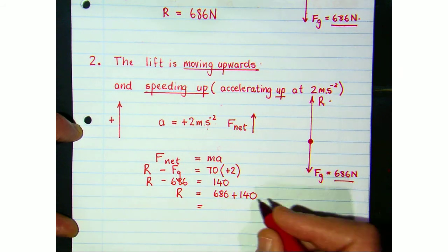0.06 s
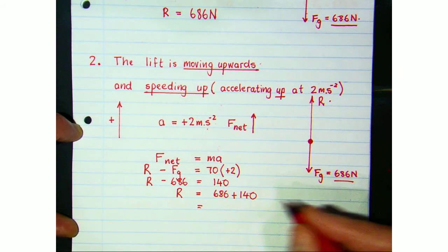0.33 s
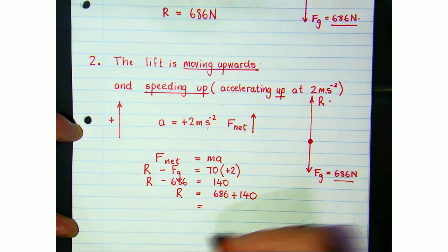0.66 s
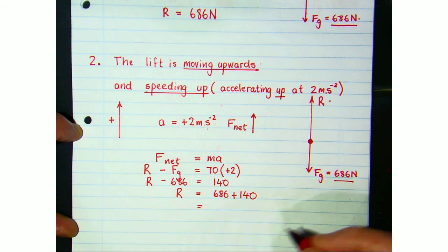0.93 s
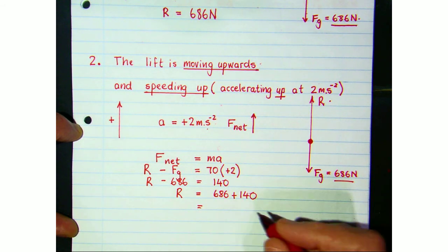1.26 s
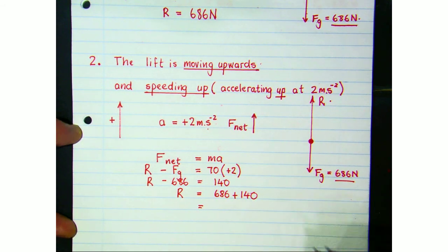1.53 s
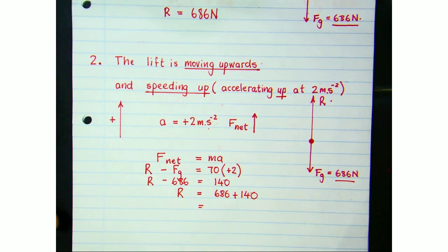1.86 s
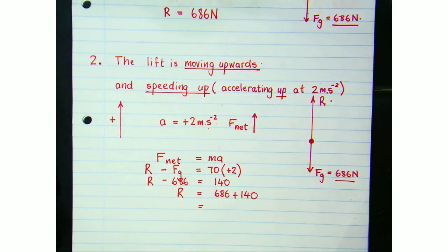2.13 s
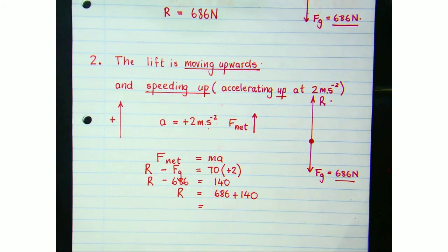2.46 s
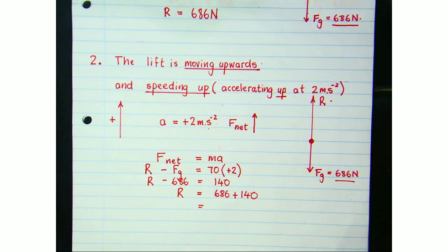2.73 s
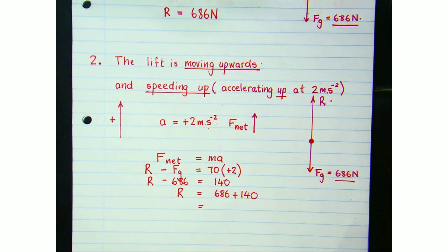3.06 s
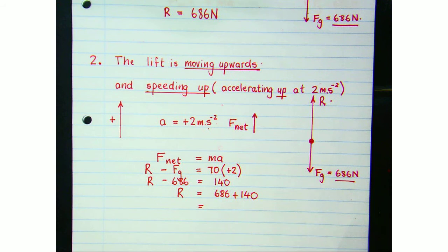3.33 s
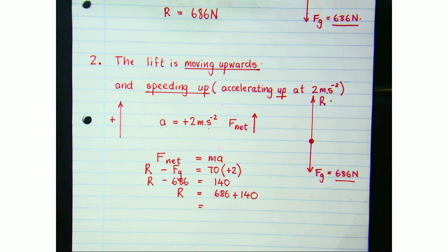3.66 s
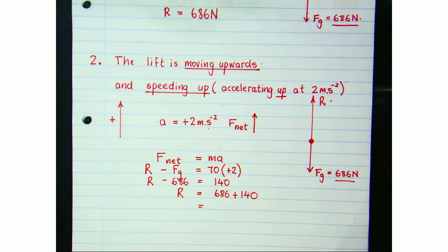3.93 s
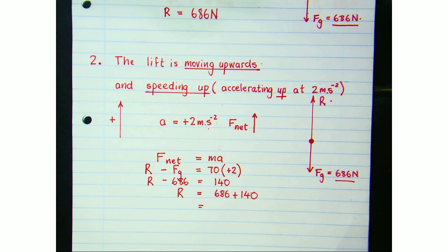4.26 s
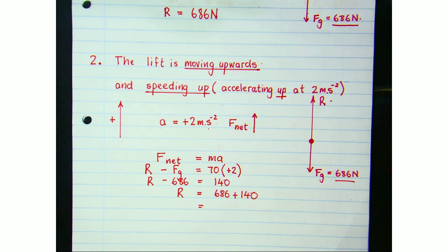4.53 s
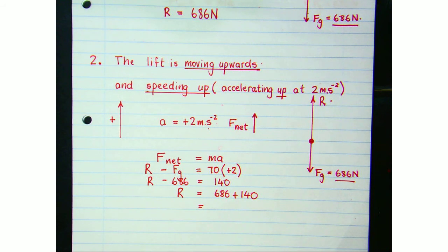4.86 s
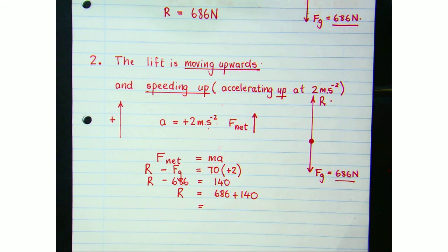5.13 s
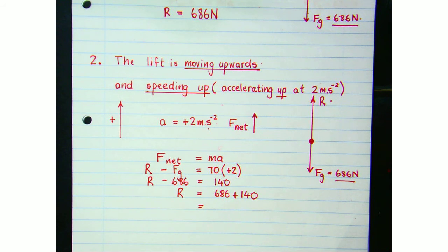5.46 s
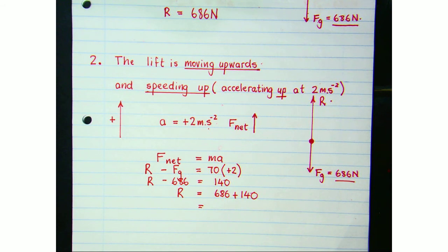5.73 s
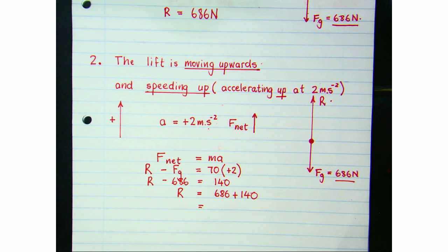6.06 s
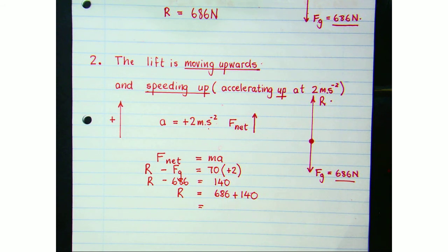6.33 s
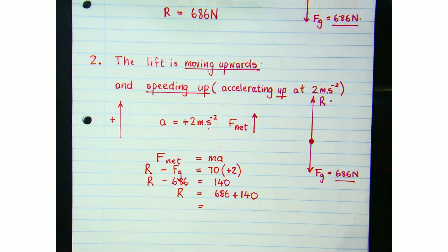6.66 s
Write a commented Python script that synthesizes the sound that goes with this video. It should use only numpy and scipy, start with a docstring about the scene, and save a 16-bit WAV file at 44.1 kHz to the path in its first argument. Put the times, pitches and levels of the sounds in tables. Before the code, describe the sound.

In a small room, a pen clatters onto a desk, then paper is briefly scuffed and softly tapped over faint hiss.

```python
"""A pen put aside on a wooden desk

In a small room a plastic pen judders over a desk by stick-slip friction, drops with a sharp clack
and bounces, setting wood and barrel ringing in their modes. Later paper is scuffed and lightly
tapped, and bumps on the desk set the microphone stand swaying and something loose buzzing.
Under it all lie hiss, a soft room hum, and a thin electronic whine with faint pips."""
import sys
import numpy as np
from scipy import signal
from scipy.fft import rfft, irfft
from scipy.io import wavfile

SR = 44100
rng = np.random.default_rng(int(sys.argv[2]) if len(sys.argv) > 2 else 0)


def digitize_waveform(pressure):
    """Quantize a signal to 16-bit integers and store it at the path in sys.argv[1].

    Rows of a 2-D input are taken as channels; values are limited to [-1, 1].
    """
    field = np.atleast_2d(pressure).T
    bounded = np.clip(field, -1, 1)
    quanta = np.round(bounded * 32767).astype(np.int16)
    wavfile.write(sys.argv[1], SR, quanta)


N = 295602
TIME = np.arange(N) / SR
AGE = TIME[:SR]   # the second that follows a blow


def from_db(db):
    """Amplitude ratio of a level in decibels."""
    return 10 ** (np.asarray(db) / 20)


def unit_energy(x):
    """Normalisation to a sum of squares of one."""
    return x / np.sqrt(np.sum(x ** 2) + 1e-20)


def at_hz(points, hz):
    """Interpolation on a logarithmic frequency axis."""
    knots, values = np.transpose(points)
    return np.interp(np.log(np.maximum(hz, 1)), np.log(knots), values)


def decay(t60, age=AGE):
    """Exponential damping: the level falls 60 dB in t60 seconds."""
    return from_db(-60 * age / t60)


def add(track, start_s, sound):
    """Superposition of a sound on a track."""
    start = min(round(start_s * SR), N)
    track[start:start + len(sound)] += sound[:N - start]


def low_pass(x, hz, order=2):
    """Butterworth low-pass filter."""
    return signal.sosfilt(signal.butter(order, hz, fs=SR, output="sos"), x)


def colour(x, spectrum):
    """Minimum-phase filter: folding the cepstrum makes the given spectrum causal."""
    size = 2 * len(x)
    gain = from_db(at_hz(spectrum, np.fft.rfftfreq(size, 1 / SR)))
    cepstrum = irfft(np.log(gain))
    cepstrum[1:size // 2] *= 2
    cepstrum[size // 2 + 1:] = 0
    return irfft(rfft(x, size) * np.exp(rfft(cepstrum)))[:len(x)]


def contact(t60, scatter_db, grain_db):
    """Contact force: one impulse, then a dying swarm of uneven small ones."""
    age = AGE[:SR // 4]
    swarm = rng.standard_normal(len(age))
    grain = from_db(grain_db * rng.standard_normal(len(age)))
    force = from_db(scatter_db) * unit_energy(swarm * grain * decay(t60, age))
    force[0] += 1
    return force


def ringing(modes, spread_db):
    """Modal sum: damped sines of alternating sign, their levels scattered by spread_db."""
    out = np.zeros(SR)
    for k, (hz, db, t60) in enumerate(modes):
        amplitude = (-1) ** k * from_db(db + spread_db * rng.normal())
        out += amplitude * decay(t60) * np.sin(2 * np.pi * hz * AGE)
    return out


def single_rings(rows, rise_s, waver_rad, waver_hz):
    """Damped resonances, one per row, each with a soft onset and a wavering phase."""
    out = np.zeros(N)
    for start_s, hz, db, t60 in rows:
        wander = np.sqrt(SR) * unit_energy(low_pass(rng.standard_normal(SR), waver_hz))
        envelope = (1 - np.exp(-AGE / rise_s)) * decay(t60)
        add(out, start_s, from_db(db) * envelope * np.sin(2 * np.pi * hz * AGE + waver_rad * wander))
    return out


def wavering_tone(hz, rate_hz, depth):
    """Random modulation: a carrier of unit rms trembles in amplitude and phase."""
    slow_noise = low_pass(rng.standard_normal((2, N + SR)), rate_hz)[:, SR:]
    in_phase, quadrature = depth * np.sqrt(N) * unit_energy(slow_noise)
    phase = 2 * np.pi * hz * TIME
    return np.sqrt(2) * ((1 + in_phase) * np.cos(phase) + quadrature * np.sin(phase))


# room and microphone noise: (frequency [Hz], relative spectral density [dB])
HISS_SPECTRUM = [(16, 2.5), (55, -9), (120, -13), (320, -21.5), (620, -23), (1050, -27.5), (1380, -24),
                 (2200, -27.5), (3000, -27), (3550, -31), (4050, -29.5), (5200, -34.5), (8900, -33),
                 (10700, -36), (15800, -39.5)]
# hum and electronic whine: (frequency [Hz], carrier rms level [dB], modulation depth [ratio])
HUM_TONES = [(571, -63.5, .26), (646, -72, .4), (732, -79, .8), (2530, -72.5, .25), (6438, -78, .5),
             (9658, -77, .3), (9690, -74.5, .25), (12878, -77.5, .3), (12909, -67.3, .09)]


def background(hiss_db, pip_db, pip_hz):
    """Noise floor: broadband hiss, narrow lines of hum and whine, and periodic electronic pips."""
    hiss = from_db(hiss_db) * np.sqrt(N) * unit_energy(colour(rng.standard_normal(N), HISS_SPECTRUM))
    hum = sum(from_db(db) * wavering_tone(hz, rate_hz=41.0, depth=depth) for hz, db, depth in HUM_TONES)
    first_s, period_s, width_s = 0.028, 0.1258, 0.006
    from_pip_s = (TIME - first_s + period_s / 2) % period_s - period_s / 2
    pips = from_db(pip_db) * np.exp(-(from_pip_s / width_s) ** 2) * np.sin(2 * np.pi * pip_hz * TIME)
    return hiss + hum + pips


# reverberation of the room: (frequency [Hz], T60 [s])
ROOM_DECAY = [(100, 0.35), (500, 0.44), (2000, 0.45), (5000, 0.38), (12000, 0.24)]


def room(x, build_s):
    """Reverberation: diffuse reflections build up and die away, the treble first."""
    hz = np.fft.rfftfreq(SR, 1 / SR)
    white = rfft(rng.standard_normal(SR))
    edges_hz = np.geomspace(60, SR / 2, 9)
    tail = np.zeros(SR)
    for low, high in zip(edges_hz, edges_hz[1:]):
        band = irfft(white * (hz >= low) * (hz < high), SR)
        tail += band * decay(at_hz(ROOM_DECAY, np.sqrt(low * high)))
    response = unit_energy(tail * (1 - np.exp(-AGE / build_s)))
    return signal.fftconvolve(x, response)[:N]


# bumps that reach the microphone stand:
# (time [s], sway gain [dB], thud gain [dB], thud cutoff [Hz], loss per rebound [dB])
STAND_BUMPS = [(4.186, -31, -24.5, 188, 5.5), (4.927, -34, -40, 160, 4), (6.111, -33, -45, 80, 0),
               (6.34, -26, -31.5, 220, 5), (6.546, -37, -27, 520, 3.5)]
# modes of desk and stand: (frequency [Hz], relative level [dB], T60 [s])
STAND_MODES = [(65, -18, 0.82), (98, 1, 0.077), (136, -9.5, 0.146), (187.3, -7, 0.072), (255, -14, 0.034)]


def microphone_stand(sway_hz, sway_t60, rebounds):
    """Free vibration: a bump leaves the stand swaying while the desk thuds in ever later rebounds."""
    out = np.zeros(N)
    sway = low_pass(decay(sway_t60, TIME) * np.cos(2 * np.pi * sway_hz * TIME), hz=76.5, order=3)
    modes = np.array([ringing([mode], spread_db=0) for mode in STAND_MODES])
    delays_s = np.append(0, 0.0215 * 2.14 ** np.arange(rebounds))
    for start_s, sway_db, thud_db, cutoff_hz, loss_db in STAND_BUMPS:
        add(out, start_s, from_db(sway_db) * sway)
        for k, delay_s in enumerate(delays_s):
            mode_gains = from_db(thud_db - loss_db * k + rng.normal(0, 1.8, len(modes)))
            add(out, start_s + delay_s, low_pass(mode_gains @ modes, cutoff_hz))
    return out


# pairs of buzzes: (time [s], energy of the first [dB], delay of the return [s])
BUZZ_PAIRS = [(6.119, -21, 0.067), (6.342, -30, 0.051), (6.548, -25.5, .053)]
# resonance of the loose part: (frequency [Hz], relative level [dB])
BUZZ_SPECTRUM = [(200, -19), (800, -2), (1080, -14), (1360, 10), (1500, 0), (1850, -18), (6000, -27)]


def stand_buzz(return_db):
    """Contact rattle: something loose buzzes twice, there and back, as the stand sways."""
    out = np.zeros(N)
    for start_s, db, return_s in BUZZ_PAIRS:
        for delay_s, lift_db in ((0, 0), (return_s, return_db)):
            rattle = colour(contact(t60=0.06, scatter_db=12, grain_db=1.5), BUZZ_SPECTRUM)
            add(out, start_s + delay_s, from_db(db + lift_db) * unit_energy(rattle))
    return out


# bumps of hand and desk: (time [s], frequency [Hz], level [dB], T60 [s])
HAND_BUMPS = [(.665, 383, -44, 0.22), (3.103, 318, -36.5, 0.29), (3.142, 338, -36.5, 0.46),
              (3.26, 111, -33.5, 0.15), (3.331, 128, -31.5, .32), (3.419, 596, -20, 0.025),
              (3.517, 218, -35.5, 0.23)]


def hand_bumps():
    """Soft impact: each touch excites one dull, hollow resonance."""
    return single_rings(HAND_BUMPS, rise_s=0.0017, waver_rad=0.49, waver_hz=59.6)


# thin high rings: (time [s], pitch [Hz], level [dB])
TING_EVENTS = [(2.937, 8700, -51), (3.098, 8920, -44)]
# their partials: (frequency over pitch [ratio], relative level [dB], T60 [s])
TING_PARTIALS = [(0.684, -11, 0.63), (1.001, -0.5, 0.35), (1.172, -5, .34), (1.3, -16, 0.33)]


def tings():
    """Inharmonic ringing: every thin ring has the same few damped partials."""
    partials = [(start_s, hz * ratio, db + partial_db, t60)
                for start_s, hz, db in TING_EVENTS for ratio, partial_db, t60 in TING_PARTIALS]
    return single_rings(partials, rise_s=0.0046, waver_rad=1.0, waver_hz=130)


# light taps on the paper: (time [s], energy [dB], spectral peak [Hz])
PAPER_TAPS = [(1.8836, -27.5, 7000), (2.088, -22.5, 8100), (2.8984, -24, 9500), (2.937, -21.5, 9500),
              (3.0974, -23.5, 9200), (4.1882, -11, 5130), (5.075, -23.5, 7450), (6.1802, -27.5, 4960),
              (6.5517, -13.5, 4940)]


def paper_taps(cutoff_hz):
    """Brief contact has a wide spectrum: each tap is a crisp snap with one broad treble peak."""
    out = np.zeros(N)
    for start_s, db, hz in PAPER_TAPS:
        spectrum = [(hz / 20, -2.75), (hz / 2, -5), (hz, 0), (hz * 1.53, -1), (hz * 2.26, -12)]
        snap = colour(contact(t60=0.028, scatter_db=10, grain_db=2), spectrum)
        add(out, start_s, from_db(db) * unit_energy(low_pass(snap, cutoff_hz, order=6)))
    return out


# scuffs of the paper: (time [s], energy [dB], T60 [s], upper cutoff [Hz])
PAPER_SCUFFS = [(3.131, -9.5, 0.1, 3350), (3.232, -12, .04, 4770), (3.297, -7, 0.082, 1100),
                (3.324, -6, 0.062, 4950), (3.419, -11, 0.33, 885), (4.225, -18.5, 0.045, 1220),
                (4.39, -19.5, 0.071, 1530), (6.543, -17, 0.047, 3000)]
# paper friction before band-limiting: (frequency [Hz], relative level [dB])
SCUFF_SPECTRUM = [(60, 17), (130, 31.5), (300, 4.5), (650, 8.5), (1050, 1.5), (2000, 0.5), (3500, -1.5),
                  (7000, -1.5), (14000, 7)]


def paper_scuffs(grip_share, low_hz):
    """Sliding friction in grainy bursts, some dull, some crisp; a long rub grips slowly."""
    out = np.zeros(N)
    high_pass = signal.butter(2, low_hz, "high", fs=SR, output="sos")
    for start_s, db, t60, high_hz in PAPER_SCUFFS:
        force = contact(t60, scatter_db=0, grain_db=2.5)
        grip = 1 - np.exp(-AGE[:len(force)] / (grip_share * t60))
        rub = signal.sosfilt(high_pass, colour(force * grip, SCUFF_SPECTRUM))
        add(out, start_s, from_db(db) * unit_energy(low_pass(rub, high_hz, order=3)))
    return out


# knock in the wood and tick in the barrel, each: (frequency [Hz], relative level [dB])
KNOCK_SPECTRUM = [(100, -8), (220, -8.5), (350, -1.5), (780, -6.5), (1200, -14.5), (1700, -29), (4500, -48),
                  (9000, -63)]
TICK_SPECTRUM = [(2000, -13), (5200, -10), (6800, 4), (8500, 0), (9700, -17), (15000, -42)]


def pen_slips(start_s, first_gap_s, count):
    """Stick-slip friction: each release of the pen's end knocks and ticks, ever sooner and weaker."""
    out = np.zeros(N)
    for k in range(count):
        release_s = start_s + first_gap_s * k ** 0.631
        knock = colour(contact(t60=0.077, scatter_db=15, grain_db=-2.5), KNOCK_SPECTRUM)
        tick = colour(contact(t60=0.012, scatter_db=2, grain_db=1), TICK_SPECTRUM)
        add(out, release_s, from_db(-6.5 - 1.2 * k) * unit_energy(knock))
        add(out, release_s, from_db(-20.5 - k) * unit_energy(tick))
    return out


# modes of desk top and pen barrel: (frequency [Hz], relative level [dB], T60 [s])
DESK_AND_PEN_MODES = [(124.2, -3, 0.56), (231, 3, 0.23), (273, -4, 0.35), (340.7, 5.5, 0.37),
                      (398, 9, 0.37), (488.5, -2.5, 0.75), (589.5, -7, 0.38), (665, 6.5, 0.37),
                      (783, -15, 0.36), (922, 8, 0.31), (1072, 2, 0.3), (1460, 1, 0.36), (1723, -2, 0.49),
                      (2680, 1, 0.38), (2870, -8, 0.35), (3710, -11, .3), (4400, -7, .25),
                      (5200, -11, 0.31), (8200, -11, 0.37)]


def desk_ring(start_s, energy_db):
    """Impulse response: the landing leaves desk top and barrel ringing under the bounces."""
    out = np.zeros(N)
    add(out, start_s, from_db(energy_db) * unit_energy(ringing(DESK_AND_PEN_MODES, spread_db=2.5)))
    return out


# the pen's two ends: (first bounce [s], energy [dB], loss per bounce [dB], treble lift [dB])
ROCKING_ENDS = [(0.824, -1.5, 1.4, 9.5), (0.8378, 6, 5, 11.5)]


def pen_bounces(count, period_s, dulling_db):
    """Inelastic rebound: the ends land in turn, weaker and duller; gives rows as in PEN_LANDING."""
    return [(first_s + period_s * k, db - loss_db * k, lift_db - dulling_db * k)
            for first_s, db, loss_db, lift_db in ROCKING_ENDS for k in range(count)]


# the pen lands on one end and its barrel slaps down: (time [s], energy [dB], treble lift [dB])
PEN_LANDING = [(.805, 13, 8.5), (.8064, 7, -11), (.812, 3, -16)]
# clack of plastic on wood: (frequency [Hz], relative level [dB])
CLACK_SPECTRUM = [(40, -15), (115, 2.5), (180, -2), (280, 7), (420, 8), (720, 0), (1000, -4), (1400, -2.5),
                  (2050, -11), (2700, -10), (4700, -11), (6800, -18.5), (8500, -17), (10000, -23),
                  (16000, -48)]


def pen_clacks(treble_hz, rattle_db):
    """Hard impact: landing and first bounces are bright, the barrel's slap and later bounces duller."""
    out = np.zeros(N)
    contacts = PEN_LANDING + pen_bounces(count=4, period_s=0.034, dulling_db=5)
    for k, (start_s, db, lift_db) in enumerate(contacts):
        # after the first contact the pen's loose parts rattle
        force = contact(t60=0.025, scatter_db=-3 + rattle_db * (k > 0), grain_db=0.5)
        clack = colour(force, CLACK_SPECTRUM)
        body = low_pass(clack, treble_hz, order=1)
        treble = from_db(lift_db) * (clack - body)
        add(out, start_s, from_db(db) * unit_energy(body + treble))
    return out


def scene():
    """Superposition: direct sound, the room's reverberation of clacks, taps and rubs, and the floor."""
    clacks = pen_clacks(treble_hz=2500, rattle_db=7.0)
    taps = paper_taps(cutoff_hz=10800) + tings()
    rubs = pen_slips(start_s=0.7198, first_gap_s=0.0226, count=8)
    rubs += paper_scuffs(grip_share=0.047, low_hz=420)
    desk = desk_ring(start_s=PEN_LANDING[0][0], energy_db=10.5) + hand_bumps()
    stand = microphone_stand(sway_hz=27.42, sway_t60=1.7, rebounds=4)
    reverb = room(from_db(-7.5) * clacks + from_db(-4.0) * taps + from_db(-2.5) * rubs, build_s=0.0094)
    buzz = stand_buzz(return_db=3.5)
    floor = background(hiss_db=-47.5, pip_db=-60, pip_hz=8000)
    return (floor + reverb + stand + buzz + desk + taps + rubs + clacks)[None]


def record(dry):
    """Soft saturation rounds the loudest peak; the converter adds an offset and limits the bandwidth."""
    ceiling, offset, cutoff_hz = 1.15, 0.0092, 15900
    rounded = ceiling * np.tanh(dry / ceiling) + offset
    return signal.sosfilt(signal.ellip(12, 0.1, 80, cutoff_hz, fs=SR, output="sos"), rounded)


dry = scene()
out = record(dry)
digitize_waveform(out)
```